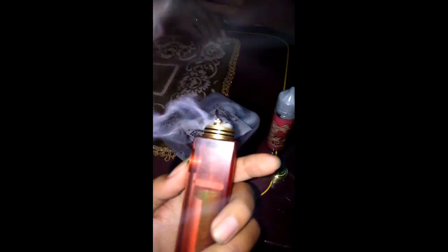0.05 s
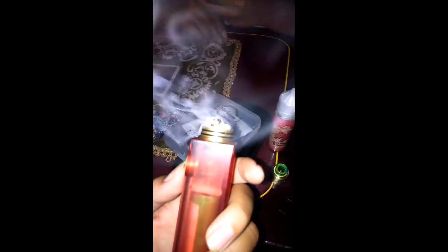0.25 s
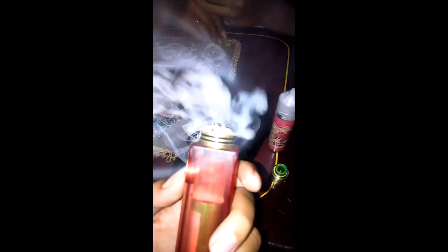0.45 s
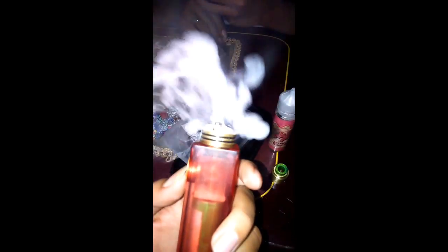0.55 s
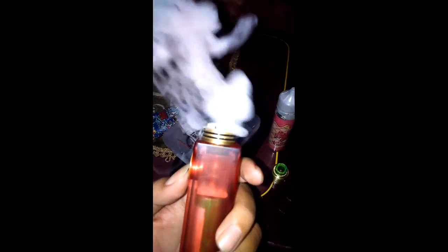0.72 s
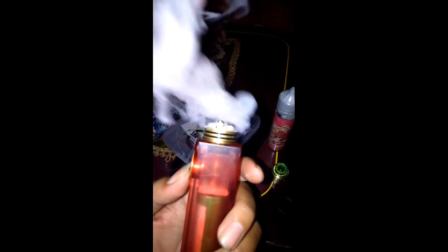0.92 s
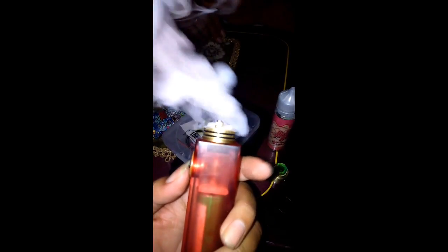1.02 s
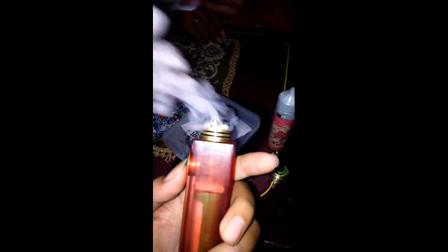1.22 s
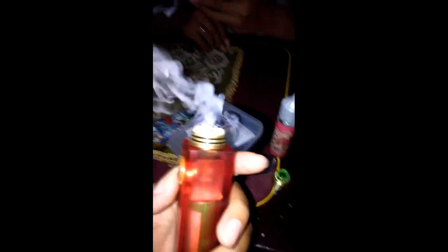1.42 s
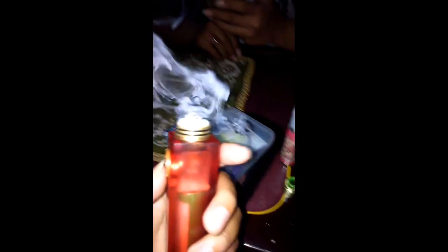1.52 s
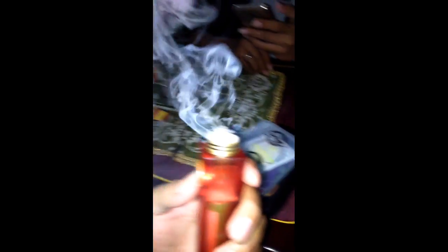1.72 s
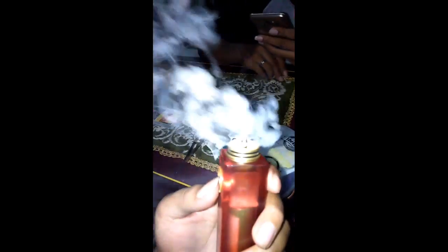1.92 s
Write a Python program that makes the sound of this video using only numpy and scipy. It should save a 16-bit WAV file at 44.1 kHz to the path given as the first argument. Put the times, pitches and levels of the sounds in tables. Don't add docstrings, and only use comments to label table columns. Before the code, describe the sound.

Vaporiser coil sizzling and crackling up close, between a button click and a sharper release click

```python
import sys
import numpy as np
from scipy import signal
from scipy.fft import rfft, irfft
from scipy.io import wavfile
from scipy.ndimage import uniform_filter1d

SR = 44100
rng = np.random.default_rng(int(sys.argv[2]) if len(sys.argv) > 2 else 0)


def bounce(signal):
    frames = np.transpose(np.atleast_2d(signal))
    limited = np.clip(frames, -1, 1)
    pcm = np.round(limited * 32767).astype(np.int16)
    wavfile.write(sys.argv[1], SR, pcm)


def volts(x):
    e = np.asarray(x, float) / 20
    return 10 ** e


N = 85995

# centre in Hz, width in Hz, lift in dB.
SHARED_MODES = [(684, 160, 4), (1880, 270, 3), (3110, 250, 4), (3420, 200, -6), (5280, 400, 6),
                (6400, 250, 3), (7200, 350, -6), (7790, 200, 3), (8200, 250, -6), (8720, 350, 4),
                (9300, 400, 3), (11100, 300, 3), (13800, 450, 4)]
# frequency in Hz, density in dB per Hz.
BURST_COLOUR = [(150, -16), (500, 0), (2000, 3.5), (5300, -1.5), (7400, 5.5), (9500, -18.5), (12500, -1),
                (16000, -31)]
BURST_RING = 0.57


def level(x, db):
    return x * volts(db) / np.sqrt(np.mean(x ** 2))


def conv(x, h):
    return signal.fftconvolve(x, h)[:len(x)]


def response(points, peaks=(), share=1):
    f_hz = np.maximum(np.arange(2049) * SR / 4096, 10)
    p = np.array(points, float)
    db = np.interp(np.log(f_hz), np.log(p[:, 0]), p[:, 1])
    for centre_hz, width_hz, lift_db in peaks:
        db = db + share * lift_db / (1 + (2 * (f_hz - centre_hz) / width_hz) ** 2)
    cepstrum = irfft(np.log(volts(db)))
    cepstrum[1:2048] *= 2
    cepstrum[2049:] = 0
    h = irfft(np.exp(rfft(cepstrum)))
    return h / np.sqrt(np.sum(h ** 2))


def walk(rate_hz):
    k = int(SR / rate_hz)
    w = uniform_filter1d(uniform_filter1d(rng.standard_normal(N), k), k)
    return w / np.std(w)


def high(x, hz):
    return signal.sosfilt(signal.butter(2, hz, "high", fs=SR, output="sos"), x)


def room():
    # frequency in Hz, density in dB per Hz.
    floor_colour = [(40, -14), (64, -0.5), (270, -15), (500, -25.5), (1000, -30.5), (5000, -50),
                    (8000, -33), (16000, -61)]
    # centre in Hz, width in Hz, level in dB.
    hum_bands = [(53.8, 8, -60.5), (102.7, 17, -66.5), (126.6, 44, -64.5), (311.7, 37.5, -68.5)]
    # time in seconds, gain in dB.
    rumble_swell = [
        (0, -7),
        (.3, 4),
        (.45, 1.1),
        (.7, 2.5),
        (.95, 4.8),
        (1.27, -3),
        (1.5, -0.5),
        (1.95, -1.5),
    ]
    floor_db, mic_hiss_db = -53.5, -63.6
    out = level(conv(rng.standard_normal(N), response(floor_colour)), floor_db)
    out = out + volts(mic_hiss_db) * rng.standard_normal(N)
    swell = volts(np.interp(np.arange(N) / SR, *np.array(rumble_swell).T))
    for hz, width_hz, db in hum_bands:
        b, a = signal.iirpeak(hz, hz / width_hz, fs=SR)
        hum = signal.lfilter(b, a, signal.lfilter(b, a, rng.standard_normal(N)))
        out = out + level(hum, db) * swell
    return out


def boil():
    # time in seconds, boil level in dB.
    coil_heat = [(0, -62.5), (.19, -58.5), (.27, -61), (.41, -72), (.5, -59), (.56, -53), (.63, -49.5),
                 (.78, -50), (.9, -48), (1.02, -49), (1.17, -48.5), (1.23, -50), (1.31, -56), (1.52, -59),
                 (1.7, -62.5), (1.83, -61), (1.95, -58.5)]
    # frequency in Hz, density in dB per Hz.
    steam_colour = [(200, -30), (550, -7), (2200, -8), (5200, -4), (9300, -3), (11500, -7), (12100, -15),
                    (15500, -20)]
    hot_db, bright_hz = -48, 7900
    bright_db_per_db = 2.94
    hiss_db, flicker_db, flicker_hz = 1, -0.5, 23.6
    fizz_db, fizz_per_s, fizz_spread_db, fizz_cap = -10.5, 900, 3.5, 2.5
    fizz_cool_db_per_db = 0.64

    heat_db = np.interp(np.arange(N) / SR, *np.array(coil_heat, float).T)
    hiss = rng.standard_normal(N) * volts(flicker_db * walk(flicker_hz))
    hiss = conv(level(hiss, hiss_db), response(steam_colour, SHARED_MODES))

    size = np.minimum(rng.exponential(size=N), fizz_cap)
    bursts = (rng.random(N) < fizz_per_s / SR) * volts(fizz_spread_db * size)
    fizz = level(conv(bursts, response(BURST_COLOUR, SHARED_MODES, BURST_RING)), fizz_db)
    mix = hiss - fizz * volts(fizz_cool_db_per_db * (hot_db - heat_db))

    spectrum = rfft(mix)
    f_hz = np.arange(len(spectrum)) * SR / N + 1
    treble = irfft(spectrum / (1 + (bright_hz / f_hz) ** 12), N)
    return volts(heat_db) * (mix - treble + treble * volts(bright_db_per_db * (heat_db - hot_db)))


def collapse(rows):
    # frequency in Hz, density in dB per Hz.
    pop_colour = [(150, -6), (600, -1), (3000, -1), (7000, -2), (11500, -2), (12800, -9), (16000, -14)]
    pop_ring, pop_lead_s, pop_gain_db = .6, .00002, 2.2
    narrow, rebound_gain, rebound_s, rebound_widths = .85, .8, .00003, 1.2
    splash_s, splash_db = .0017, -18
    out = np.zeros(N + 1024)
    tone = response(pop_colour, SHARED_MODES, pop_ring)
    wet = response(BURST_COLOUR, SHARED_MODES, BURST_RING)
    for (start_s, db, ms, rebound), grit in zip(rows, rng.standard_normal((len(rows), 1024))):
        i = int((start_s - .0004) * SR)
        t = (i + np.arange(1024)) / SR - start_s + pop_lead_s
        width_s = narrow * ms / 1000
        inward = np.exp(-2 * (t / width_s) ** 2)
        back = np.exp(-2 * ((t - rebound_s - rebound_widths * width_s) / width_s) ** 2)
        share = rebound_gain * np.clip(rebound - .15, 0, 1.3)
        suck = conv(inward - share * back, tone)
        splash = conv(grit * np.exp(-t / splash_s) * (t > 0), wet)
        out[i:i + 1024] += volts(db + pop_gain_db) * (volts(splash_db) * splash - suck / suck.max())
    return out[:N]


def pops():
    # time in seconds, peak in dB, bubble collapse in ms, rebound share.
    wick_ticks = [(0.00068, -48.1, 0.038, 0.34), (0.00213, -49.8, 0.041, 0.35),
                  (0.00794, -39.4, 0.053, 0.87), (0.0155, -38.0, 0.055, 0.65),
                  (0.02822, -42.3, 0.045, 0.61), (0.04055, -40.3, 0.055, 0.34),
                  (0.04486, -40.3, 0.045, 0.84), (0.05435, -38.9, 0.055, 0.8),
                  (0.06396, -40.3, 0.045, 0.56), (0.07826, -44.8, 0.067, 1.07),
                  (0.09795, -39.4, 0.062, 0.6), (0.11552, -43.0, 0.048, 1.05),
                  (0.13621, -40.6, 0.074, 0.87), (0.15803, -41.7, 0.055, 0.53),
                  (0.15917, -40.4, 0.053, 0.99), (0.24319, -44.5, 0.065, 0.19),
                  (0.27603, -47.7, 0.045, 1.26), (1.29153, -48.1, 0.031, 1.4),
                  (1.30056, -38.6, 0.031, 0.72), (1.51262, -41.3, 0.053, 0.59),
                  (1.52189, -44.0, 0.062, 1.24), (1.55922, -42.9, 0.05, 1.03),
                  (1.58649, -41.3, 0.055, 1.16), (1.62726, -47.8, 0.065, 1.4),
                  (1.67022, -45.5, 0.062, 1.31), (1.72574, -43.5, 0.055, 0.9), (1.7368, -44.7, 0.055, 1.37),
                  (1.74189, -42.9, 0.055, 0.82), (1.7564, -40.7, 0.053, 1.4), (1.77335, -39.3, 0.05, 1.21),
                  (1.77719, -44.8, 0.05, 0.69), (1.804, -36.0, 0.055, 0.96), (1.82485, -38.9, 0.05, 0.96),
                  (1.83033, -37.1, 0.053, 1.07), (1.89126, -42.3, 0.041, 1.21),
                  (1.94665, -58.1, 0.062, 1.4), (1.94743, -51.1, 0.043, 1.4), (1.94849, -52.2, 0.055, 0.96),
                  (1.94918, -55.9, 0.033, 1.4), (1.94994, -56.7, 0.038, 0.05)]
    lone_pops = [(0.39925, -48.2, 0.041, 0.72), (0.45393, -40.0, 0.055, 0.72),
                 (0.49094, -36.7, 0.053, 0.94), (0.51329, -41.0, 0.065, 0.53), (0.55133, -40.7, 0.033, 0.8),
                 (0.56976, -39.1, 0.069, 1.39), (0.57433, -31.7, 0.062, 0.93), (0.57546, -39.4, 0.057, 1.4),
                 (0.58522, -37.6, 0.045, 1.09), (0.58605, -31.2, 0.048, 1.0), (0.59877, -38.1, 0.036, 0.37),
                 (0.6095, -37.2, 0.06, 0.45), (0.61233, -34.1, 0.041, 0.73), (0.61985, -26.3, 0.055, 0.56),
                 (0.6423, -32.9, 0.074, 0.68), (0.66645, -29.5, 0.041, -0.08),
                 (0.68791, -35.3, 0.122, 0.25), (0.70771, -35.6, 0.036, 0.69),
                 (0.74301, -26.0, 0.057, 0.52), (0.74365, -41.2, 0.031, 1.4), (0.76054, -28.8, 0.048, 1.24),
                 (0.7811, -34.2, 0.055, 0.39), (0.80083, -31.4, 0.053, 0.67), (0.82492, -28.1, 0.053, 0.34),
                 (0.84887, -36.6, 0.033, 1.4), (0.84972, -28.1, 0.045, 1.04), (0.86433, -23.2, 0.098, 1.32),
                 (0.88778, -34.7, 0.074, 0.8), (0.96394, -31.1, 0.043, 0.93), (0.97308, -27.3, 0.038, 1.38),
                 (0.98994, -26.7, 0.038, 0.48), (1.00102, -32.0, 0.043, 0.6), (1.00406, -25.6, 0.036, 0.61),
                 (1.00522, -35.1, 0.036, 1.3), (1.0299, -27.6, 0.043, 0.36), (1.03179, -29.3, 0.041, 0.58),
                 (1.04951, -29.2, 0.038, 0.64), (1.06038, -32.3, 0.077, 0.46),
                 (1.07593, -30.6, 0.038, 0.64), (1.08825, -23.0, 0.086, 0.86),
                 (1.09529, -31.2, 0.055, 1.22), (1.10602, -33.6, 0.053, 0.55),
                 (1.12111, -29.7, 0.048, 1.07), (1.12317, -33.8, 0.06, 1.12), (1.14215, -22.5, 0.06, 0.24),
                 (1.17346, -34.5, 0.101, 1.09)]
    pairs = [
        (.39915, -37, .06, .7),
        (.66662, -31, .045, 1.1),
        (1.00388, -29, .035, 1.0),
        (1.14236, -26, .04, 1.3),
    ]
    loudest = [
        (.91967, -17.5, .045, .1),
        (.91982, -27, .04, .8),
        (.92001, -13.5, .05, 1.4),
    ]
    return collapse(wick_ticks) + collapse(lone_pops) + collapse(pairs) + collapse(loudest)


def strike(contacts, modes, cut_hz, snap_db=-17):
    snap_s, ring_t60_max_s = 0.00042, .0075
    out = np.zeros(N)
    m = np.array(modes, float)
    u = np.arange(900) / SR
    chance = zip(rng.random((len(contacts), len(m))), rng.standard_normal((len(contacts), 900)))
    for (start_s, db), (turn, grit) in zip(contacts, chance):
        waves = np.sin(2 * np.pi * (m[:, :1] * u + .08 * turn[:, None]))
        decay = np.exp(-np.log(1000) * u / np.minimum(m[:, 2:], ring_t60_max_s))
        ring = volts(m[:, 1]) @ (waves * decay)
        ring = ring * np.minimum(u / .0001, 1)
        snap = volts(snap_db) * grit * np.exp(-u / snap_s)
        i = int(start_s * SR)
        out[i:i + 900] += volts(db) * (ring / np.abs(ring).max() + snap)
    return high(high(out, cut_hz), cut_hz / 2)


def button():
    # time in seconds, peak in dB.
    press = [
        (.2102, -23.5),
        (.21116, -27.5),
        (.2125, -58),
        (.2131, -38),
    ]
    release = [
        (1.1965, -13.5),
        (1.19724, -9.5),
        (1.1982, -29),
        (1.1997, -31),
    ]
    creak = [
        (1.6546, -31.5),
        (1.6550, -40),
        (1.6564, -39),
    ]
    # frequency in Hz, level in dB, t60 in seconds.
    press_modes = [(2410, -9, .0035), (3220, -9, 0.0077), (3770, 0.5, 0.0083), (5300, 7, 0.0051),
                   (6000, -5, 0.0043), (4500, -3, 0.006), (6460, -30, .004), (7740, 1, 0.0065),
                   (7950, -9, .005), (9610, 0.5, 0.0065), (10600, -7, .005), (12150, -11, .005),
                   (14500, -21, .002)]
    release_modes = [(1650, -26, .006), (2970, -0.5, 0.0027), (3670, 7.5, 0.0021), (4570, 7.5, 0.0038),
                     (5480, 0, 0.0064), (6500, 2.5, 0.0023), (6000, -4, 0.0034), (7250, -2.5, 0.0062),
                     (10300, -31, 0.0023), (9260, 1, 0.006), (11200, -16, .004), (12100, -6, 0.0047),
                     (14650, -20, 0.0017)]
    creak_modes = [(1723, -24, .008), (3700, -10, 0.0045), (4100, 5, 0.0088), (5640, -13, 0.0048),
                   (6140, 9.5, 0.0048), (6900, -15, 0.0055), (8900, -23, .005)]
    cut_hz = 2200
    clicks = strike(press, press_modes, cut_hz) + strike(release, release_modes, cut_hz)
    return clicks + strike(creak, creak_modes, cut_hz)


def burst_ring():
    # time in seconds, peak in dB.
    chime = [
        (.92009, -23),
    ]
    knock = [
        (.9197, -26),
    ]
    # frequency in Hz, level in dB, t60 in seconds.
    chime_modes = [(4300, -4, .002), (5200, 0, .004), (8650, -3, .007), (13800, -14, .006)]
    knock_modes = [(283, -1, 0.01), (740, -10, 0.012), (1080, 1, 0.002), (1490, -14, 0.0033)]
    return strike(chime, chime_modes, 2200) - strike(knock, knock_modes, 100, snap_db=-np.inf)


def scene():
    echo_t60_s, echo_db = 0.026, -15
    floor = room()
    near = boil() + pops() + button() + burst_ring()
    t = np.arange(int(.2 * SR)) / SR
    echo = rng.standard_normal(len(t)) * np.exp(-np.log(1000) * t / echo_t60_s) * (t > .002)
    echo = echo / np.sqrt(np.sum(echo ** 2))
    return (near + volts(echo_db) * conv(near, echo) + floor)[None]


def roll_off(x):
    return signal.sosfilt(signal.butter(12, 16480, fs=SR, output="sos"), x)


def record(dry):
    bass_cut_hz, top_hz = 35, 15470
    x = signal.sosfilt(signal.butter(4, bass_cut_hz, "high", fs=SR, output="sos"), dry)
    x = signal.sosfilt(signal.ellip(8, .5, 32, top_hz, fs=SR, output="sos"), x)
    return roll_off(x)


dry = scene()
out = record(dry)
bounce(out)
```